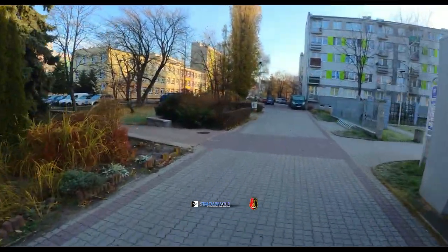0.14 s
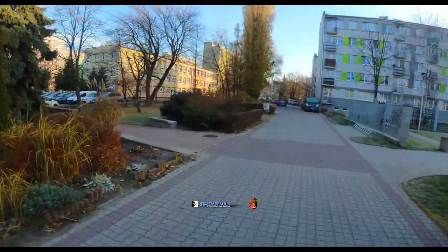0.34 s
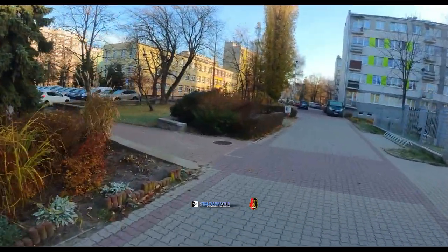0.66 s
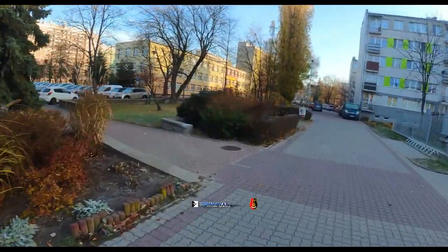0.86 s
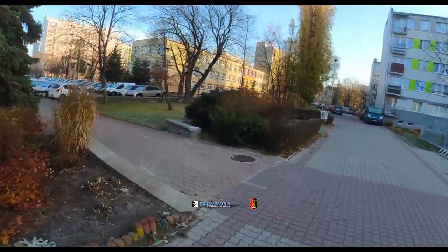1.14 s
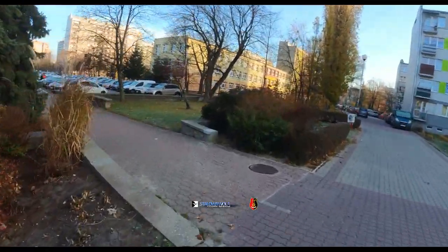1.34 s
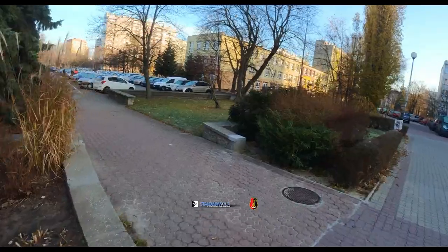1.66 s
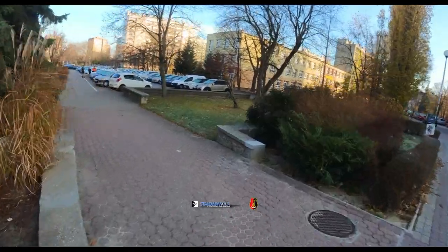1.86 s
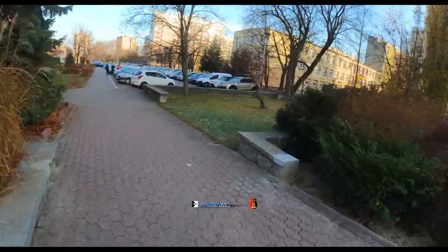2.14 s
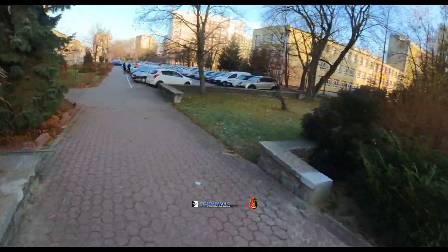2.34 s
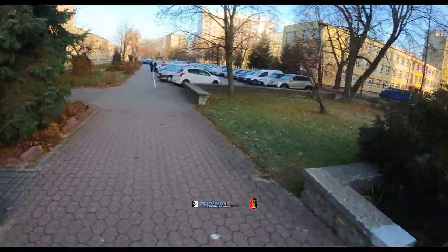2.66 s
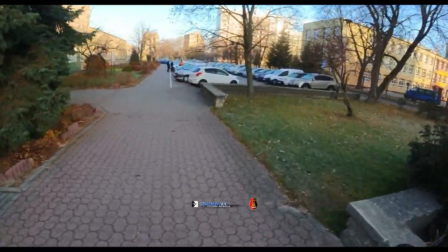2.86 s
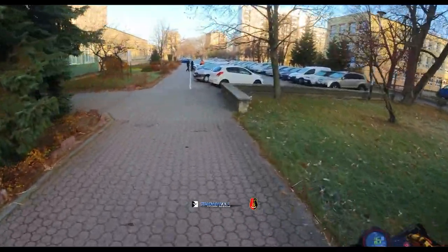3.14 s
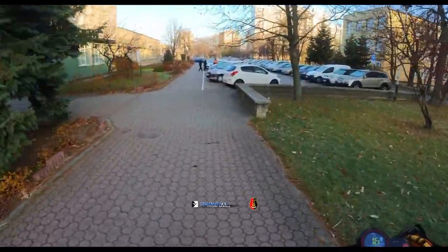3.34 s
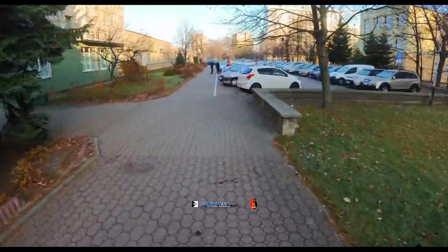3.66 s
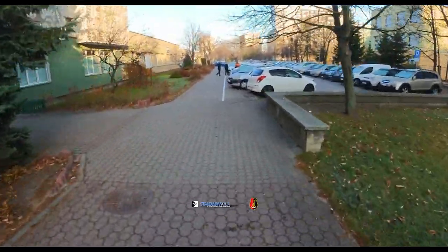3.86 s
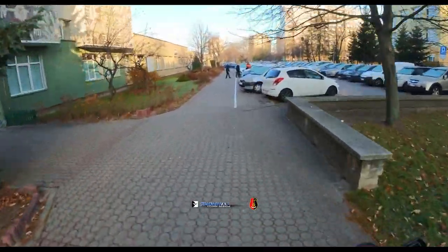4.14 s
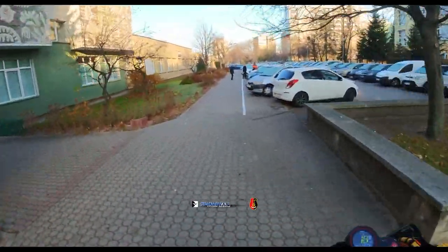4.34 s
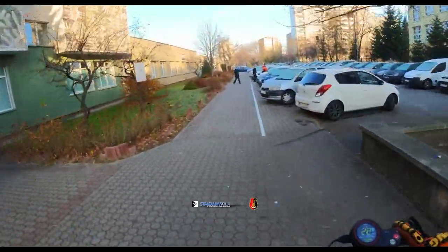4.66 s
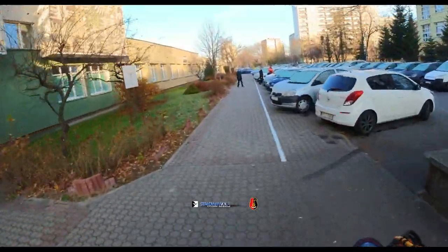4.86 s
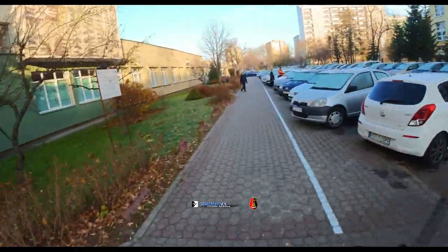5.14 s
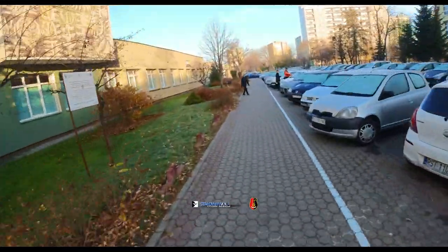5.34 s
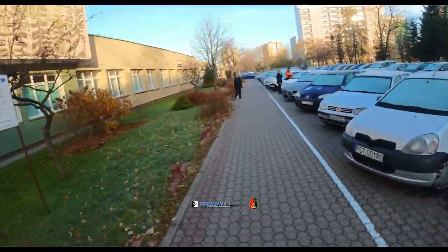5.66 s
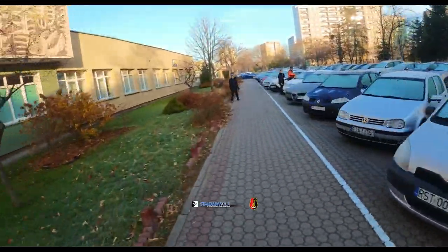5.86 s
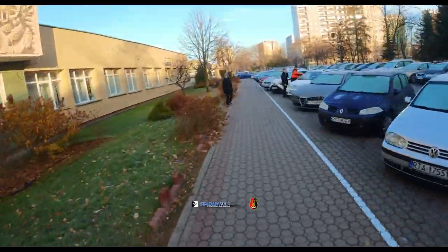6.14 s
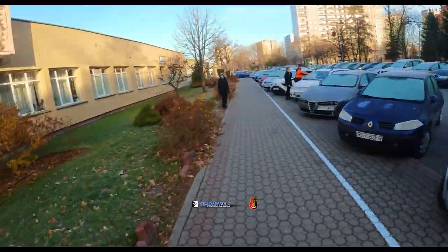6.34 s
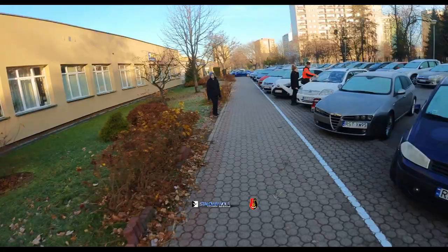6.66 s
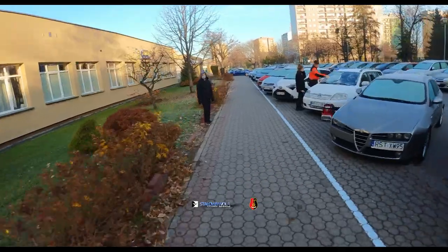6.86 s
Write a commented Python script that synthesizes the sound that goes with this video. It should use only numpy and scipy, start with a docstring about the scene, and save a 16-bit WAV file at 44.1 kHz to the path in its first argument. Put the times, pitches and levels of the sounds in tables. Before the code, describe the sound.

A small electric two-wheeler coasts softly over block paving, a sharp crack, then hammering judder and a rising motor whine before loud rumbling, rattling rolling.

```python
"""A small electric two-wheeler coasts and slows through a turn: noise for air and tyres, faint motor tones.
Soft bumps, a few chassis blows, a brief squeal and a sharp crack lead into louder rolling noise.
Then the hub motor pulls: a stack of gliding sines whines upward, noise growls and the chassis judders.
At speed random taps through filters rumble over the paving joints, ring the frame and buzz the fittings.
A last short growl comes with a rising motor whine at the end, made of short gliding sines."""
import sys
import numpy as np
from scipy import signal
from scipy.fft import rfft, irfft, next_fast_len
from scipy.io import wavfile
from scipy.ndimage import uniform_filter1d, map_coordinates

SR = 44100
rng = np.random.default_rng(int(sys.argv[2]) if len(sys.argv) > 2 else 0)


def master(y):
    """Save y as 16-bit WAV."""
    cut = np.clip(np.atleast_2d(y).T, -1, 1)
    pcm = np.round(cut * 32767)  # scale
    wavfile.write(sys.argv[1], SR, pcm.astype(np.int16))


N = 308259

# How hard the paving shakes the vehicle, before the part trims below.
# Each row: time in seconds, frame shaking in dB, tyre rumble in dB, fittings buzz in dB.
RIDE = [(0.0, -44, -55, -52), (0.14, -51, -58.5, -61.5), (0.36, -56.5, -62, -63), (0.77, -52.5, -64, -63),
        (1.0, -55.5, -60, -64.5), (1.8, -58, -75, -68.5), (1.98, -52.5, -66, -66.5),
        (2.17, -59, -76, -71.5), (2.55, -58, -70, -71), (3.1, -55, -61.5, -64), (3.45, -47, -59.5, -63.5),
        (3.64, -47, -45, -58.5), (3.86, -47, -43, -59), (4.08, -46.5, -42.5, -59),
        (4.55, -41.5, -40.5, -60.5), (4.78, -37.5, -34, -57), (4.98, -41.5, -38.5, -50),
        (5.1, -38, -40, -45), (5.35, -39.5, -40, -48), (5.8, -40.5, -42.5, -50), (6.12, -43, -38, -51),
        (6.35, -38.5, -35.5, -47.5), (6.6, -41, -40, -48.5), (6.98, -41.5, -38.5, -45.5)]
# Short gliding notes of rubbing parts, and in the last two rows the motor's last rising whine.
# Each row: start in seconds, length in seconds, pitch in Hz, level in dB,
# pitch unsteadiness as a share, glide as a share per second.
GLIDING_NOTES = [(2.685, 0.028, 618, -46, 0.12, 2), (2.653, 0.07, 1203, -52.5, 0.091, -0.5),
                 (2.688, 0.014, 1360, -52, 0.056, -2), (4.379, 0.05, 497, -30, 0.018, 0),
                 (4.414, 0.022, 1138, -31, 0.028, 0), (4.45, 0.039, 1110, -30, 0.025, -1),
                 (4.489, 0.039, 1096, -31, 0.029, -0.3), (6.909, 0.043, 697, -32, 0.073, 3),
                 (6.946, 0.056, 769, -35.5, 0.064, 1)]
# Tyres meeting raised blocks. Each row: start in seconds, level in dB, pitch of the frame's answer in Hz.
BUMPS = [(0.155, -39, 512), (0.212, -41.5, 487), (0.547, -41.5, 485), (0.727, -41.5, 325),
         (0.765, -40.5, 487), (1.27, -40.5, 497), (1.635, -45, 510), (1.718, -43.5, 760), (1.925, -41, 638),
         (1.999, -42.5, 528), (2.047, -42.5, 749), (2.641, -37, 248), (2.645, -36.5, 421),
         (2.775, -42, 495), (2.89, -40.5, 500), (3.135, -39.5, 490), (3.268, -36.5, 478),
         (3.322, -44.5, 284), (3.424, -38, 650), (3.481, -34.5, 436), (3.638, -43, 625), (3.785, -36, 620),
         (3.824, -42, 710), (3.96, -36.5, 616), (4.894, -32.5, 660), (4.997, -31.5, 697),
         (5.134, -36.5, 544), (5.252, -36.5, 685), (5.394, -33, 640), (5.514, -35.5, 619),
         (5.857, -36, 696), (6.214, -32.5, 672), (6.405, -35.5, 502), (6.472, -37, 492),
         (6.543, -33.5, 591), (6.951, -29, 750)]
# Grit pinging from under a tyre. Each row: start in seconds, peak in dB, pitch in Hz,
# fall by 60 dB in seconds.
GRIT = [(0.814, -53.5, 3230, 0.012), (0.82, -62, 3250, 0.012), (0.8725, -45, 3100, 0.0096),
        (0.882, -63, 3080, 0.022), (3.237, -58.5, 3300, 0.016), (4.531, -51, 3160, 0.08),
        (5.344, -65, 9500, 0.043)]
# Resonances of the frame. Each row: centre in Hz, width in Hz, level in dB.
FRAME_MODES = [(349, 29, -19.5), (495.2, 16.6, 0), (676, 210, -36), (1070, 46, -31)]
# Tyre rumble colour. Each row: frequency in Hz, relative level in dB.
RUMBLE_COLOUR = [(20, -66.5), (38, -47.5), (50, -24), (65, -10), (85, 1.5), (110, 2), (150, -1.5),
                 (205, -5), (300, -11), (420, -22), (700, -38), (1500, -86.5)]
# Tread slap colour. Each row: frequency in Hz, relative level in dB.
TREAD_COLOUR = [(100, -32.5), (220, 2), (300, 3), (370, 2), (440, 3), (560, -4.5), (630, 6.5), (730, 3),
                (850, -5), (1000, -17.5), (1090, -7.5), (1250, -22.5), (2200, -21.5), (5000, -58.5)]
# Buzz colour of the loose fittings. Each row: frequency in Hz, relative level in dB.
FITTINGS_COLOUR = [(600, -53), (1150, -21), (1330, -4.5), (1480, 3.5), (1680, 4.5), (1850, -3.5),
                   (1960, -8.5), (2100, -9.5), (2300, -34.5), (2600, -39.5), (3500, -36.5), (6000, -63.5)]
# Growl colour of the labouring motor. Each row: frequency in Hz, relative level in dB.
LABOUR_COLOUR = [(40, -47), (120, -22), (280, 5), (420, -1), (490, 0.5), (560, 0.5), (750, -0.5),
                 (860, 1.5), (980, -9), (1090, -1.5), (1220, -21), (1400, -22), (2200, -18.5),
                 (2800, -32.5), (3600, -37), (5000, -61.5)]
# Dull knock colour of a chassis blow. Each row: frequency in Hz, relative level in dB.
KNOCK_COLOUR = [(40, -51), (100, -23.5), (230, -8), (350, -1.5), (500, 2.5), (760, 7), (1100, -12.5),
                (1500, -7.5), (2500, -44), (5000, -78.5)]
# Bright clack colour of a chassis blow. Each row: frequency in Hz, relative level in dB.
CLACK_COLOUR = [(600, -34), (1200, 2), (1600, 8.5), (2150, 5), (2450, -7), (2680, -16), (2900, -23),
                (3300, -27), (4200, -50), (10000, -62)]
# Soft thud colour of a raised block. Each row: frequency in Hz, relative level in dB.
BUMP_COLOUR = [(40, -49.5), (100, -25.5), (300, 9), (520, 1), (720, 6), (1000, -10.5), (1700, -11.5),
               (2600, -25.5), (5000, -35.5), (10000, -82)]
# Colour of the surrounding streets. Each row: frequency in Hz, relative level in dB.
AIR_COLOUR = [(20, -35), (100, 4.5), (600, -1), (1100, -0.5), (2000, -6), (3000, -10.5), (4200, -17),
              (5500, -28.5), (7300, -33.5), (8500, -26.5), (9600, -23.5), (10500, -27.5), (12700, -29)]
# Overtones of the motor's whine. Each row: pitch ratio, level in dB.
OVERTONES = [(1, 3), (2.13, -7.5), (2.6, -14), (3.1, -16), (3.45, -20), (3.72, -18.5)]
# Colour of a crack against the frame. Each row: frequency in Hz, relative level in dB.
CRACK_COLOUR = [(300, -27), (900, -12.5), (1380, 6.5), (1800, -5), (2200, -7), (2520, 2.5), (2850, -2.5),
                (3400, -8), (4000, -21.5), (4600, -26), (5400, -43.5), (6900, -36), (10000, -43)]
# Rattle colour of the loose fittings. Each row: frequency in Hz, relative level in dB.
RATTLE_COLOUR = [(200, -1.5), (450, 8.5), (750, 4), (950, -21.5), (1100, 10), (1300, 7), (1550, 1),
                 (1850, -20.5), (2100, -7.5), (2400, -28.5), (3000, -33), (6000, -54)]
# The motor pulling. Each row: start in seconds, length in seconds, growl level in dB, attack in seconds.
PULLS = [(4.152, 0.588, -35.5, 0.12), (6.917, 0.2, -39, 0.04)]
# The whine as the motor takes up the load. Each row: time in seconds, pitch in Hz, level in dB.
WHINE = [(4.16, 269, -39), (4.185, 276.4, -37), (4.205, 283.5, -31), (4.24, 298.8, -32),
         (4.29, 314.5, -33.5), (4.33, 323, -37), (4.35, 328.6, -46), (4.44, 333, -50)]
# How the body passes the whine. Each row: frequency in Hz, gain in dB.
WHINE_BODY = [(260, -0.5), (308, -1.5), (335, 2), (520, -22), (610, 2), (650, -0.5), (682, 11), (730, -1),
              (840, -6.5), (895, 12.5), (960, -5), (1030, -6), (1085, 4), (1180, -12.5)]
# The motor murmuring while coasting. Each row: start in seconds, length in seconds, pitch in Hz, level in dB.
MURMURS = [(0.84, 0.16, 277.4, -54), (2.994, 0.38, 273.2, -55)]
# Blows of the chassis, a quick judder as the motor pulls. Each row: start in seconds, level in dB,
# clack against that level in dB, chatter length in seconds.
KNOCKS = [(2.045, -45, -5, 0.032), (2.605, -45.5, 2, 0.065), (2.634, -41.5, 2, 0.022),
          (2.644, -33.5, -16, 0.05), (3.081, -40, -3, 0.035), (4.257, -37.5, -6, 0.055),
          (4.281, -26, -14, 0.055), (4.334, -29.5, -11, 0.041), (4.374, -27.5, -16, 0.045),
          (4.412, -16, -14.5, 0.045), (4.447, -17.5, -8, 0.055), (4.483, -17.5, -11, 0.053),
          (4.524, -8, -10.5, 0.017), (4.561, -18, -10, 0.024), (4.599, -25.5, -9, 0.069),
          (4.642, -28, -13, 0.081), (4.677, -30, -13, 0.04), (4.713, -30, -7.5, 0.047),
          (4.788, -33, -15, 0.035), (4.829, -38.5, -5, 0.058), (4.86, -33.5, -6, 0.032),
          (4.937, -31.5, -4.5, 0.052), (4.967, -38, -6.5, 0.033), (5.002, -25, -9.5, 0.022),
          (5.033, -38.5, -1, 0.039), (5.17, -26, -10.5, 0.054), (5.188, -26.5, -7, 0.045),
          (5.228, -35, -16, 0.019), (5.304, -45, -8, 0.022), (5.367, -35.5, -10, 0.024),
          (5.522, -33.5, -20, 0.025), (5.636, -33, -7, 0.022), (5.759, -33.5, -8, 0.03),
          (6.213, -30.5, -23, 0.12), (6.247, -35, -8, 0.03), (6.308, -32, -6.5, 0.038),
          (6.451, -36, -5, 0.013), (6.491, -38, -7, 0.011), (6.547, -33, -15, 0.021),
          (6.579, -40, -3, 0.014), (6.632, -35.5, -3, 0.017), (6.778, -35, -9, 0.033),
          (6.915, -42, -6, 0.025), (6.951, -33, -2.5, 0.021)]
# Sharp cracks of a stone or a stop against the frame. Each row: start in seconds, level in dB.
CRACKS = [(2.047, -37), (3.4988, -13), (3.96, -27.5), (4.528, -20.5)]
# A tyre dropping into a hollow. Each row: start in seconds, level in dB.
THUMPS = [(3.496, -46), (3.734, -36), (3.903, -41), (4.287, -35.5), (4.406, -31), (4.67, -30),
          (4.833, -30.5), (4.92, -31), (4.961, -25.5), (5.138, -28), (5.319, -30.5), (5.392, -40),
          (5.67, -33.5), (5.905, -33.5), (6.083, -29.5), (6.337, -28), (6.388, -30.5), (6.443, -30.5),
          (6.852, -30), (6.917, -34.5)]
# Brief dips of the rolling noise. Each row: middle in seconds, length in seconds, depth in dB.
LULLS = [(3.378, 0.076, -8), (3.585, 0.04, -6), (4.002, 0.046, -4), (4.78, 0.054, -3), (5.026, 0.025, -2.5),
         (5.745, 0.034, -0.5), (6.187, 0.05, -2.5), (6.515, 0.068, -1)]

TOP_HZ = 12770  # the microphone's band limit
RUMBLE_DB, TREAD_DB, FRAME_DB = 2, -4.5, -2.5  # rumble over its curve; tread and frame over the shaking
FITTINGS_DB, RATTLE_DB = -1, -7.5  # buzz and rattle over the fittings' curve
GENTLE_DB, HARD_DB = -50, -41.5  # shaking when rolling gently and at speed
JOLT_RATE = 34  # random changes of push a second from the unevenly laid blocks
JOLT_GENTLE_DB, JOLT_HARD_DB = 2.5, 0.7  # the jolts stand apart when gentle and merge at speed
TREAD_HARD_DB = 1.5  # extra slap of the tread at speed
JOINT_RATE_HZ, JOINT_SCATTER = 22, 0.32  # joints met a second; their unevenness as a share of the gap
THUMP_HZ, THUMP_SCATTER, THUMP_RISE_S = 99.2, 0.15, 0.014  # bounce pitch, scatter share, time to its peak
THUMP_LOW_HZ = 57  # high-pass corner of the bounce
BUMP_THUD_DB, BUMP_RING_DB, BUMP_RING_T60_S, BUMP_RING_ATTACK_S = -6, 2.5, 0.084, 0.006
GRIT_RISE_S, GRIT_SCRAPE = 0.0019, 0.6  # a stone's onset; how far scraping blurs its note in radians
NOTE_ROUGH_DB = 37  # level flutter of the gliding notes per unit of unsteadiness
CHATTER_ATTACK_S, STRIKE_DB = 0.00313, 9  # the parts close, strike hard, then chatter
REBOUND_RATE = 450  # mean tiny rebounds a second within a blow
REBOUND_DB, SCRAPE_DB = 9.5, -4  # rebounds before their doubling, and the scraping between them
PULL_RELEASE_S = 0.073


def amp(db):
    """Decibels to gain."""
    return 10 ** (np.asarray(db) / 20)


def unit(x):
    """x at rms 1."""
    return x / np.sqrt(np.mean(x ** 2) + 1e-20)


def curves(rows):
    """One value per sample for each column after the time."""
    s, *cols = np.transpose(rows)
    return [np.interp(np.arange(N) / SR, s, c) for c in cols]


def wobble(rate):
    """A smooth random curve, rate knots a second."""
    knots = rng.standard_normal(int(N * rate / SR) + 4)
    return map_coordinates(knots, [np.arange(N) * rate / SR])


def filtered(x, response):
    """x times a complex response of frequency."""
    m = 2 * next_fast_len(N // 2 + SR // 4)
    return irfft(rfft(x, m) * response(np.fft.rfftfreq(m, 1 / SR)), m)[:N]


def coloured(x, points):
    """x through a causal filter of unit power shaped by (Hz, dB) points."""
    def response(hz):
        f, db = np.transpose(points)
        gain = unit(amp(np.interp(np.log(hz + 1), np.log(f), db)))
        # folding the cepstrum forward in time gives minimum phase
        cepstrum = irfft(np.log(gain))
        half = len(cepstrum) // 2
        return np.exp(rfft(np.r_[cepstrum[0], 2 * cepstrum[1:half]], len(cepstrum)))
    return filtered(x, response)


def impacts(rate, spread_db):
    """Random tiny blows, rate a second on average, of scattered strength."""
    hits = rng.random(N) < rate / SR
    signs = rng.choice([-1, 1], N)
    return hits * signs * amp(spread_db * np.clip(rng.standard_normal(N), -2, 2))


def burst(t60):
    """A contact that starts to chatter and dies away."""
    t = np.arange(SR // 4) / SR
    return rng.standard_normal(len(t)) * np.minimum(t / CHATTER_ATTACK_S, 1) * amp(-60 * t / max(t60, .005))


def swell(t, length, attack, release):
    """An envelope that rises, holds and falls within length."""
    return np.clip(t / attack, 0, 1) * np.clip((length - t) / release, 0, 1)


def add(track, s, sound):
    """Mix a sound in at time s."""
    part = track[max(round(s * SR), 0):][:len(sound)]
    part += sound[:len(part)]


def air():
    """The steady wash of the streets around, coloured noise with a faint hiss on top."""
    return amp(-61) * unit(coloured(rng.standard_normal(N), AIR_COLOUR))


def grit():
    """Small stones ping from under the tyres; hard contacts crack against the frame."""
    pings, blows, t = np.zeros(N), np.zeros(N), np.arange(SR // 20) / SR
    for s, db, hz, t60 in GRIT:
        scrape = GRIT_SCRAPE * wobble(1300)[:len(t)]
        onset = (1 - np.exp(-t / GRIT_RISE_S)) ** 2
        ring = np.sin(2 * np.pi * hz * t + scrape) * onset * amp(-60 * t / t60)
        add(pings, s, amp(db) * ring / np.abs(ring).max())
    for s, db in CRACKS:
        add(blows, s, amp([db]))
        add(blows, s, amp(db - 30.5) * burst(t60=0.063))  # the contact skitters
    return pings + coloured(blows, CRACK_COLOUR)


def gliding_notes():
    """Rubbing parts, and at the end the motor's rising whine, sing briefly on unsteady, gliding sines."""
    out = np.zeros(N)
    for s, length, hz, db, unsteady, glide in GLIDING_NOTES:
        n = int(length * SR)
        pitch_hz = hz * (1 + glide * np.arange(n) / SR + unsteady * wobble(400)[:n])
        flutter = amp(NOTE_ROUGH_DB * unsteady * wobble(250)[:n])
        note = np.sin(2 * np.pi * np.cumsum(pitch_hz) / SR)
        add(out, s, amp(db) * flutter * signal.windows.tukey(n, .6) * note)
    return out


def bumps():
    """Raised blocks give soft noise thuds, and the frame answers with a short, wavering note."""
    blows, rings, t = np.zeros(N), np.zeros(N), np.arange(SR // 4) / SR
    answer = amp(BUMP_RING_DB - 60 * t / BUMP_RING_T60_S) * (1 - np.exp(-t / BUMP_RING_ATTACK_S))
    for s, db, hz in BUMPS:
        add(blows, s, amp(db + BUMP_THUD_DB) * burst(t60=0.08))
        note = np.sin(2 * np.pi * hz * t + 0.84 * wobble(163)[:len(t)])
        add(rings, s, amp(db) * answer * note)
    return coloured(blows, BUMP_COLOUR) + rings


def thumps():
    """A tyre drops into a hollow and bounces for a few low cycles."""
    out, t = np.zeros(N), np.arange(SR // 6) / SR
    u = t / THUMP_RISE_S
    envelope = (u * np.exp(1 - u)) ** 2
    chances = np.clip(rng.standard_normal(len(THUMPS)), -2, 2)
    for (s, db), chance in zip(THUMPS, chances):
        hz = THUMP_HZ * (1 + THUMP_SCATTER * chance)
        add(out, s, amp(db) * envelope * np.sin(2 * np.pi * hz * t))
    highpass = signal.butter(N=4, Wn=THUMP_LOW_HZ, btype="highpass", fs=SR, output="sos")
    return signal.sosfilt(highpass, out)


def paving():
    """The jolts of single blocks in dB, shared by tyres, frame and buzz; slow undulations are taken out."""
    shake_db = curves(RIDE)[0]
    ground = wobble(JOLT_RATE)
    steps = unit(ground - uniform_filter1d(ground, size=SR // 8))
    depth_db = np.interp(shake_db, [GENTLE_DB, HARD_DB], [JOLT_GENTLE_DB, JOLT_HARD_DB])
    return depth_db * np.clip(steps, -2, 2)


def contact():
    """The gain of the rolling noise, which dips briefly on smoother blocks."""
    dip_db = np.zeros(N)
    for s, length, db in LULLS:
        add(dip_db, s - length / 2, db * signal.windows.tukey(int(length * SR), .5))
    return amp(dip_db)


def frame_ring(x):
    """x through the frame's resonances, band-passes of alternating sign."""
    def response(f):
        total = 0
        for k, (centre, width, db) in enumerate(FRAME_MODES):
            damping = 1j * f * width
            total = total + (-1) ** k * amp(db) * damping / (centre * centre - f * f + damping)
        return total
    return filtered(x, response)


def frame(jolt_db):
    """The frame burbles on its main mode, kept going by the patter of the paving."""
    shake_db = curves(RIDE)[0]
    tilt = [(100, -30.0), (300, 7.0), (1100, -2.5), (1500, -12.5), (4000, -37.5)]  # Hz, relative dB
    ring = coloured(frame_ring(impacts(rate=2700, spread_db=3.5)), tilt)
    # levelled, so that the shaking and the flutter set its strength
    swing = np.sqrt(np.abs(uniform_filter1d(ring ** 2, size=3000)) + 1e-12)
    # each block gives its own push, and the note wavers as the frame flexes
    flutter = unit(amp(jolt_db + 4 * np.tanh(2 * wobble(24))))
    flex = .0004 * SR * wobble(16)  # time shift in samples
    ring = map_coordinates(ring / swing, [np.arange(N) + flex], mode="nearest")
    return amp(shake_db + FRAME_DB) * flutter * ring


def clatter(spread_db, t60):
    """Every paving joint gives a small knock that chatters briefly as fading noise."""
    count = int(JOINT_RATE_HZ * N / SR)
    late, size = np.clip(rng.standard_normal((count, 2)), -2, 2).T
    at = (np.arange(count) + JOINT_SCATTER * late) * SR / JOINT_RATE_HZ
    strikes = np.bincount(np.clip(at, 0, N - 1).astype(int), amp(spread_db * size), N)
    fading = signal.lfilter([1], [1, -amp(-60 / (max(t60, .005) * SR))], strikes)
    return fading * rng.standard_normal(N)


def rolling(jolt_db):
    """Paving joints shake the tyres and loose fittings: filtered random taps, plus a rattle at each joint."""
    shake_db, rumble_db, fittings_db = curves(RIDE)
    rumble_taps = impacts(rate=1100, spread_db=3.0) * amp(jolt_db + 0.78 * wobble(14))
    rumble = unit(coloured(rumble_taps, RUMBLE_COLOUR))
    tread_taps = impacts(rate=1100, spread_db=4.0) * amp(jolt_db + 1.1 * wobble(22))
    tread = unit(coloured(tread_taps, TREAD_COLOUR))
    buzz_taps = impacts(rate=700, spread_db=5.5) * amp(0.45 * jolt_db + 2.0 * wobble(48))
    buzz = unit(coloured(buzz_taps, FITTINGS_COLOUR))
    rattle = unit(coloured(clatter(spread_db=6.0, t60=0.07), RATTLE_COLOUR))
    fittings = amp(FITTINGS_DB) * buzz + amp(RATTLE_DB) * rattle
    tread_db = shake_db + TREAD_DB + np.interp(shake_db, [GENTLE_DB, HARD_DB], [0, TREAD_HARD_DB])
    return amp(rumble_db + RUMBLE_DB) * rumble + amp(tread_db) * tread + amp(fittings_db) * fittings


def blow(length):
    """Rebounds and scraping build for a few milliseconds to a hard strike, then go on as a cluster that stops
    abruptly."""
    t = np.arange(SR // 4) / SR
    gaps, sizes = rng.random((2, len(t) // 40))
    at = (np.cumsum(.5 + gaps) * SR / REBOUND_RATE).astype(int)
    kicks = (.5 + sizes) * rng.choice([-1, 1], len(at))
    rebounds = np.bincount(at, kicks, len(t))[:len(t)]
    chatter = amp(SCRAPE_DB) * rng.standard_normal(len(t)) + 2 * amp(REBOUND_DB) * rebounds
    fade = amp(-60 * np.minimum(t / max(length, .005), 2) ** 2)  # falls ever faster
    sound = chatter * np.minimum(t / CHATTER_ATTACK_S, 1) * fade
    sound[round(CHATTER_ATTACK_S * SR)] += amp(STRIKE_DB)
    return sound


def judder():
    """Play in the chassis hammers: each blow is a dull knock with a bright clack."""
    knocks, clacks = np.zeros(N), np.zeros(N)
    for s, db, clack_db, length in KNOCKS:
        add(knocks, s, amp(db - 10) * blow(length))
        add(clacks, s, amp(db + clack_db - 4.0) * blow(length))
    return coloured(knocks, KNOCK_COLOUR) + coloured(clacks, CLACK_COLOUR)


def whine(pitch_hz, waver):
    """The motor's note; each overtone swells as it glides through a resonance of the body."""
    hz = pitch_hz * (1 + waver * wobble(90))
    phase = 2 * np.pi * np.cumsum(hz) / SR
    body_hz, body_db = np.transpose(WHINE_BODY)
    out = np.zeros(N)
    for ratio, db in OVERTONES:
        level_db = db + np.interp(ratio * hz, body_hz, body_db) + 2.9 * wobble(60)
        out += amp(level_db) * np.sin(ratio * phase)
    return out


def motor():
    """The hub motor murmurs while coasting, then whines upward as it pulls, with a growl of random taps."""
    now = np.arange(N) / SR
    pitch_hz, whine_db = curves(WHINE)
    start, end = WHINE[0][0], WHINE[-1][0]
    rise = swell(now - start, end - start, attack=0.01, release=0.022)
    out = amp(whine_db) * rise * whine(pitch_hz, waver=0.00906)
    growl = unit(coloured(impacts(rate=1000, spread_db=5.0), LABOUR_COLOUR))
    for s, length, hz, db in MURMURS:
        out += amp(db) * swell(now - s, length, attack=0.087, release=0.091) * whine(hz, waver=0.09)
    for s, length, db, attack in PULLS:
        out += amp(db) * swell(now - s, length, attack, PULL_RELEASE_S) * growl
    return out


def scene():
    """Everything at the rider's one microphone."""
    jolt_db = paving()
    road = contact() * (rolling(jolt_db) + frame(jolt_db))
    return (air() + grit() + gliding_notes() + bumps() + thumps() + road + judder() + motor())[None]


def record(dry):
    """The microphone passes nothing above its band limit."""
    return np.array([filtered(x, lambda hz: hz < TOP_HZ) for x in dry])


dry = scene()
out = record(dry)
master(out)
```